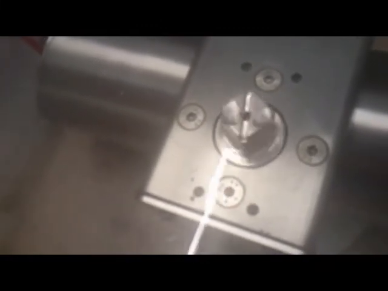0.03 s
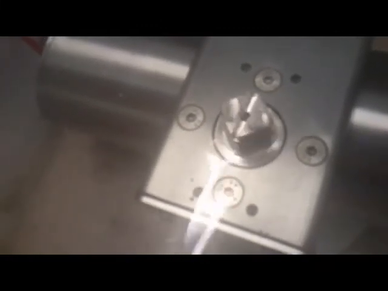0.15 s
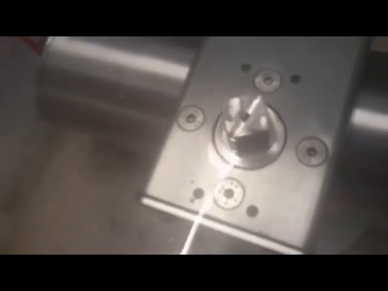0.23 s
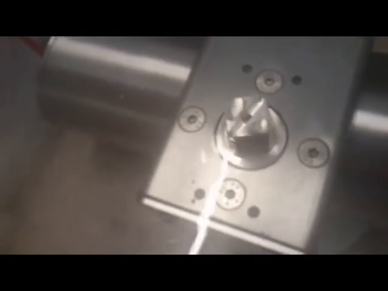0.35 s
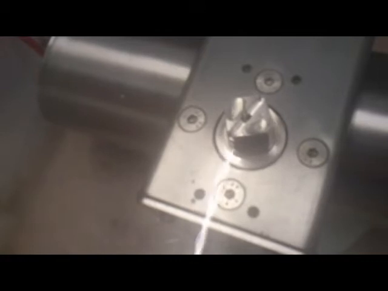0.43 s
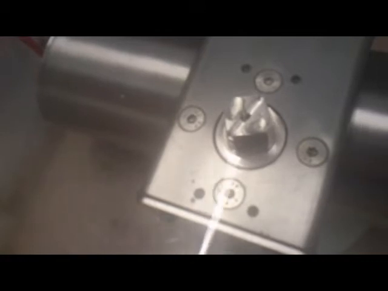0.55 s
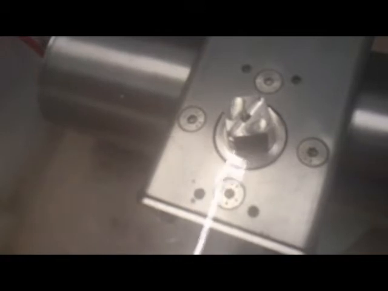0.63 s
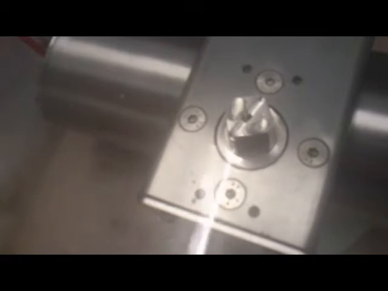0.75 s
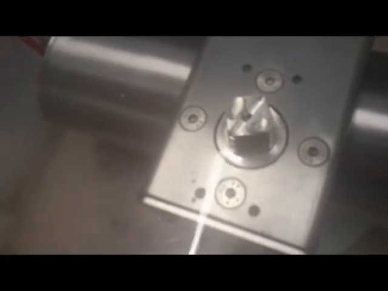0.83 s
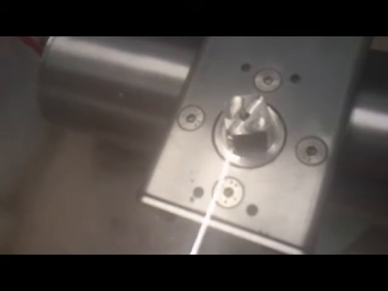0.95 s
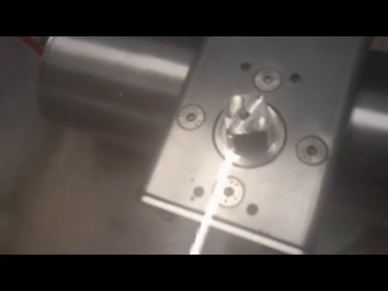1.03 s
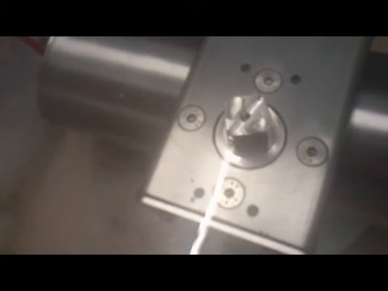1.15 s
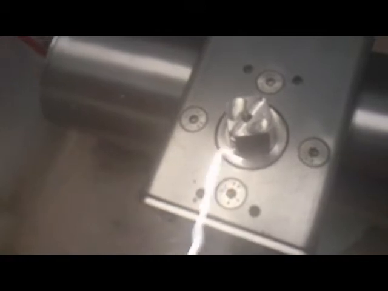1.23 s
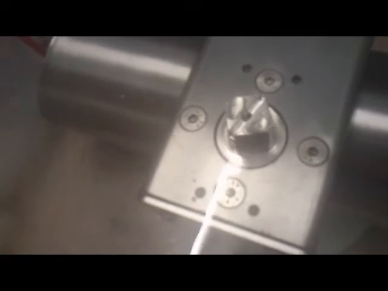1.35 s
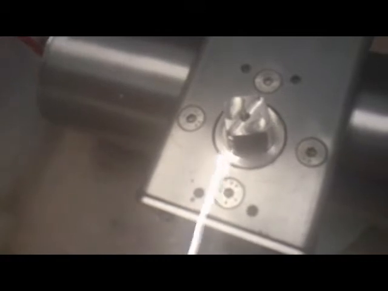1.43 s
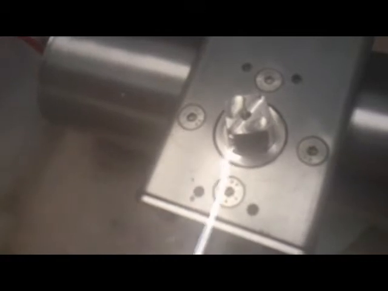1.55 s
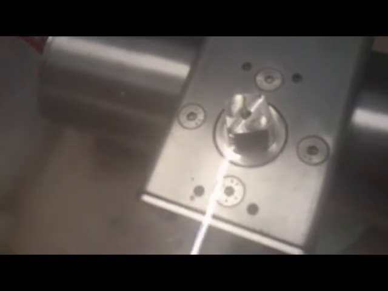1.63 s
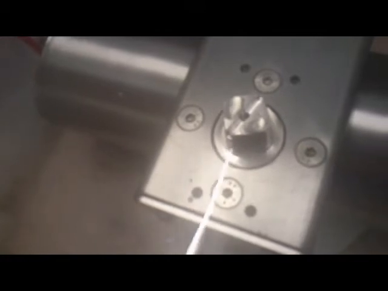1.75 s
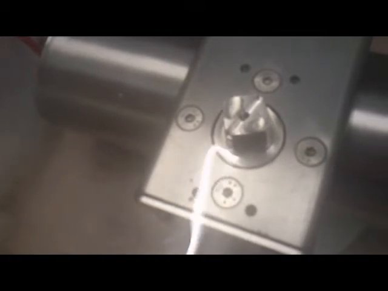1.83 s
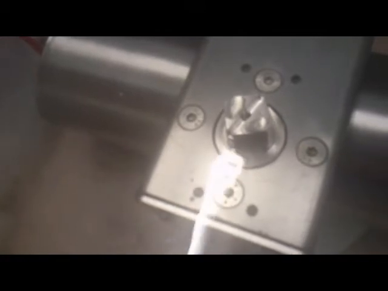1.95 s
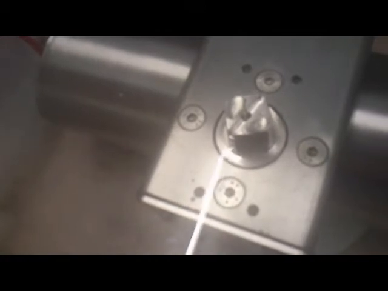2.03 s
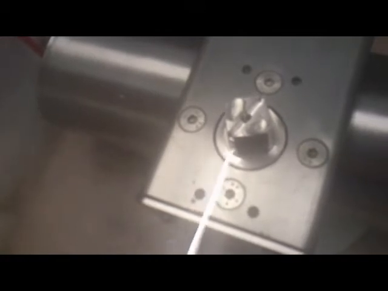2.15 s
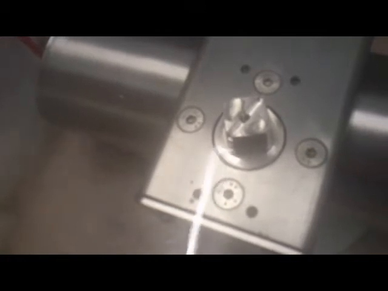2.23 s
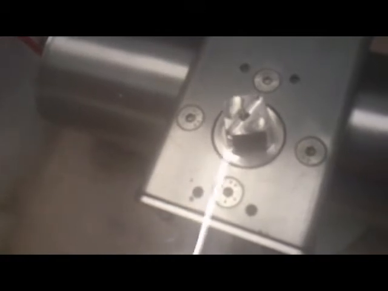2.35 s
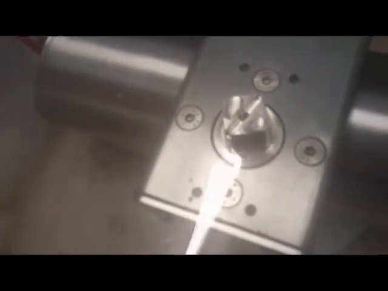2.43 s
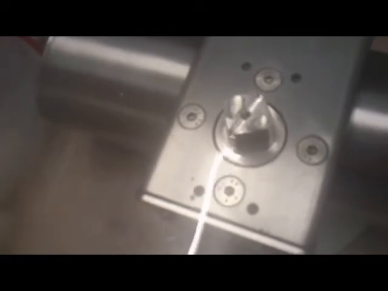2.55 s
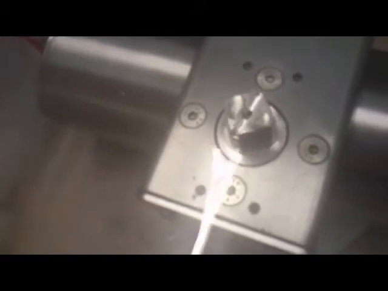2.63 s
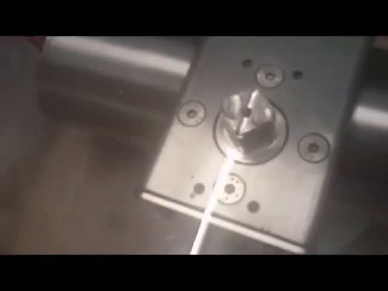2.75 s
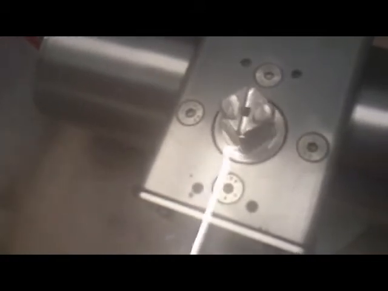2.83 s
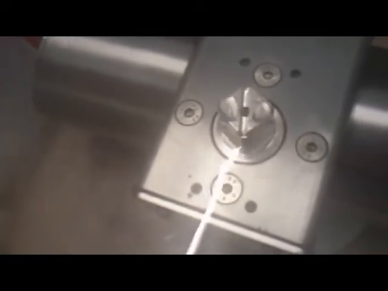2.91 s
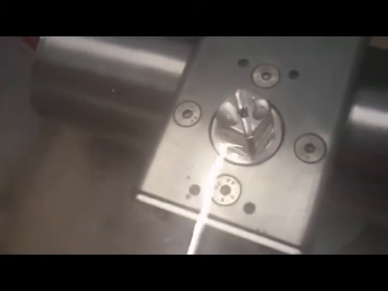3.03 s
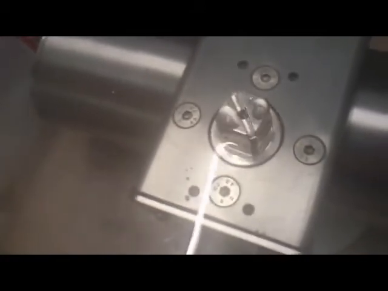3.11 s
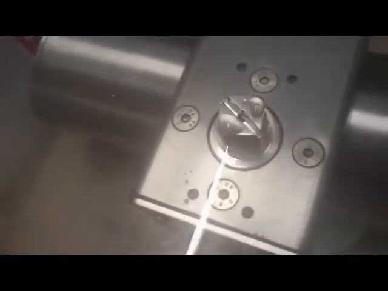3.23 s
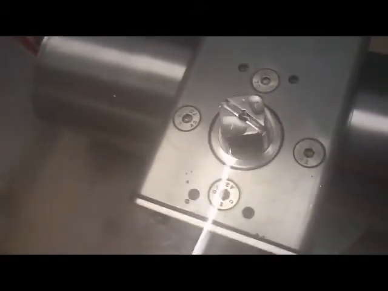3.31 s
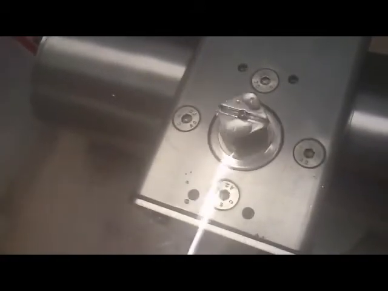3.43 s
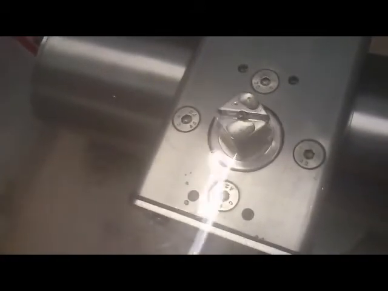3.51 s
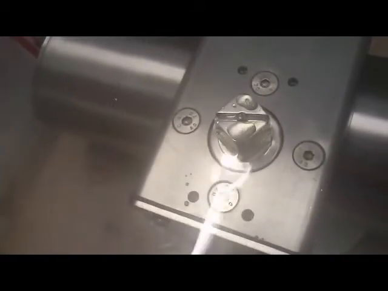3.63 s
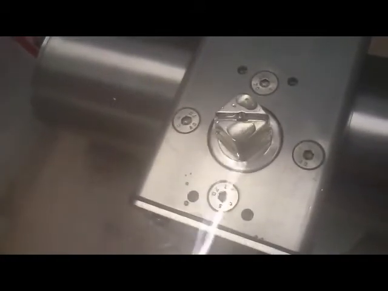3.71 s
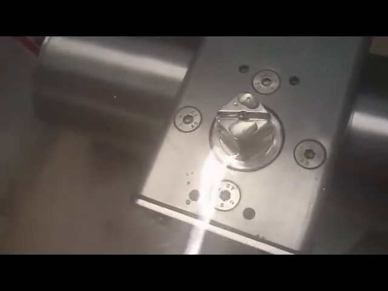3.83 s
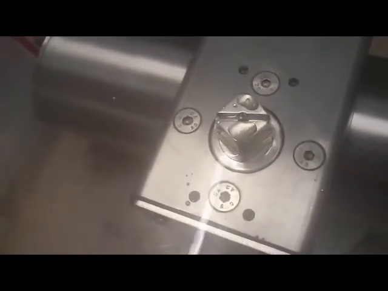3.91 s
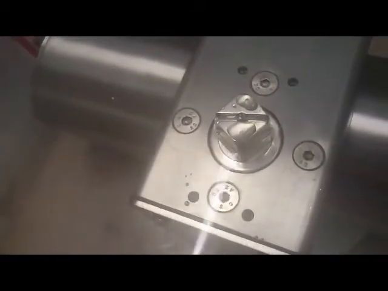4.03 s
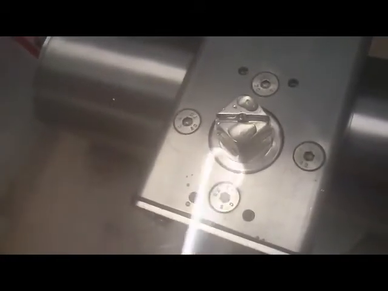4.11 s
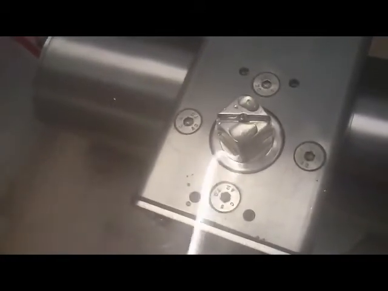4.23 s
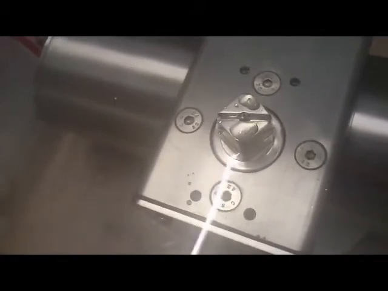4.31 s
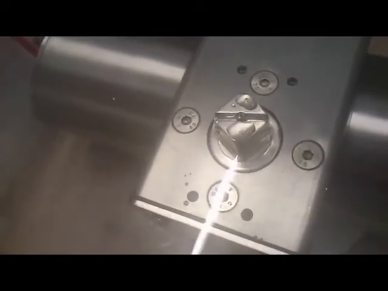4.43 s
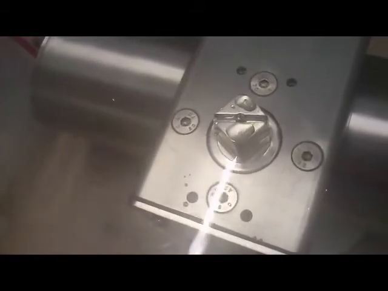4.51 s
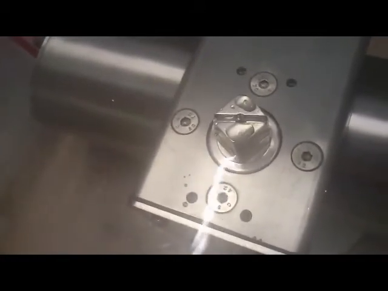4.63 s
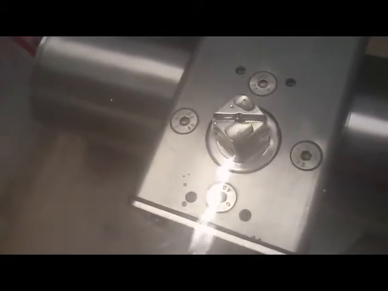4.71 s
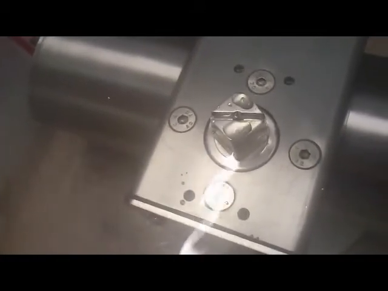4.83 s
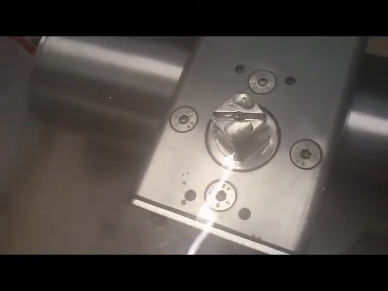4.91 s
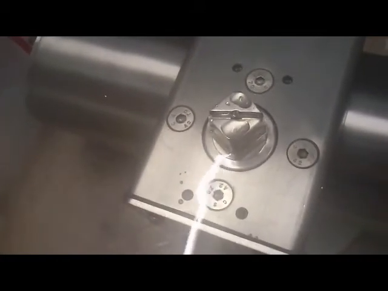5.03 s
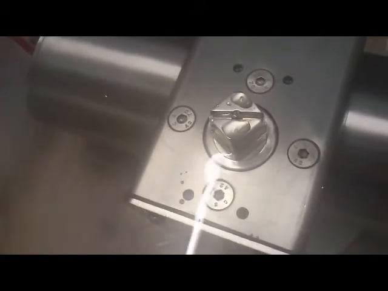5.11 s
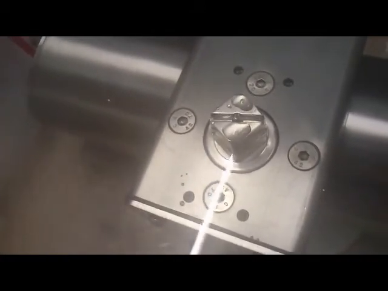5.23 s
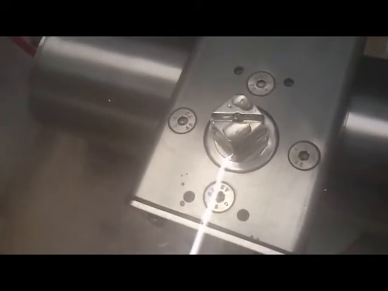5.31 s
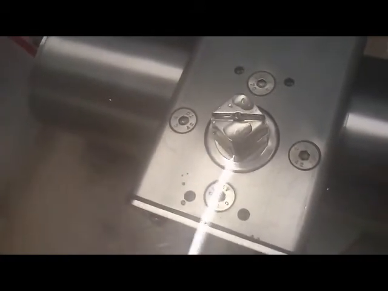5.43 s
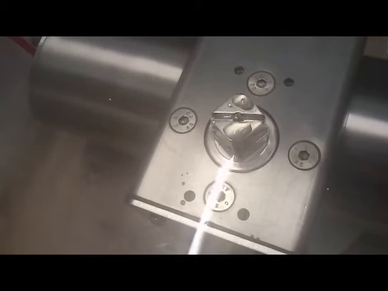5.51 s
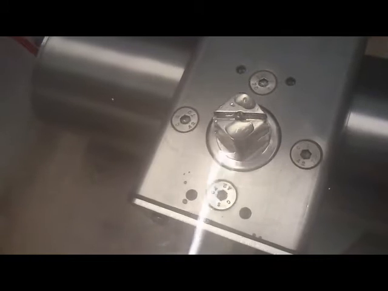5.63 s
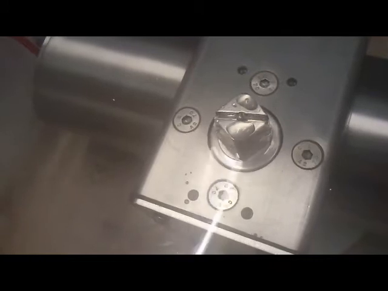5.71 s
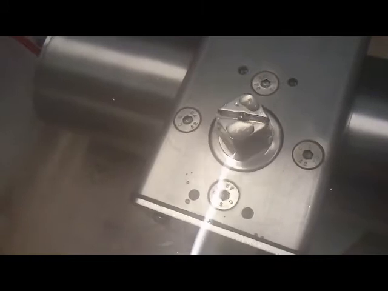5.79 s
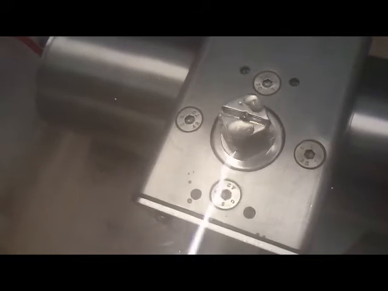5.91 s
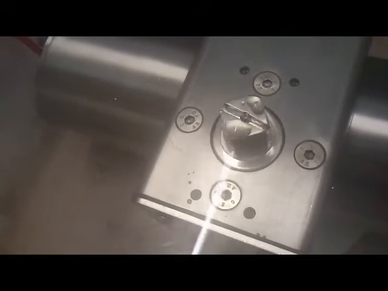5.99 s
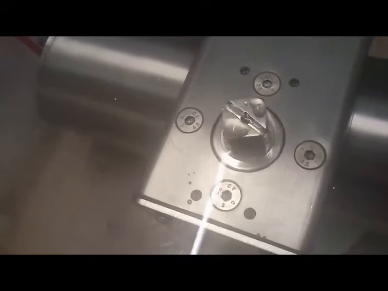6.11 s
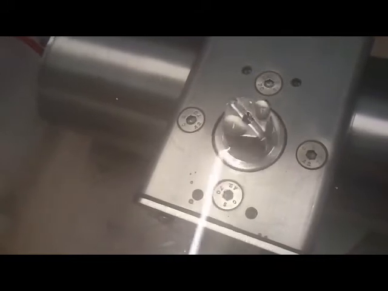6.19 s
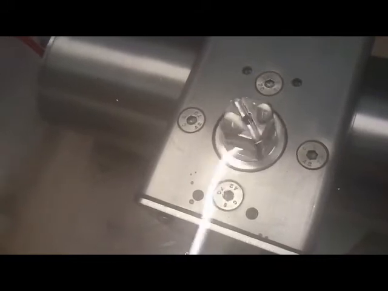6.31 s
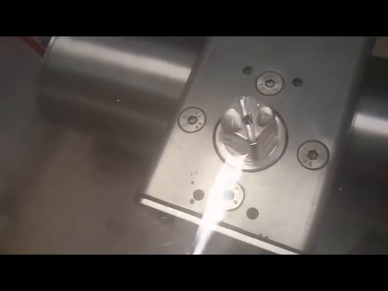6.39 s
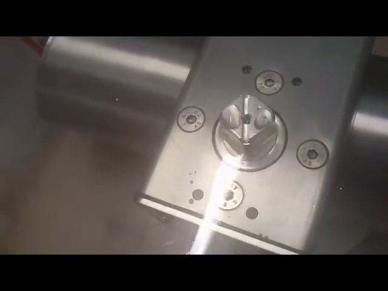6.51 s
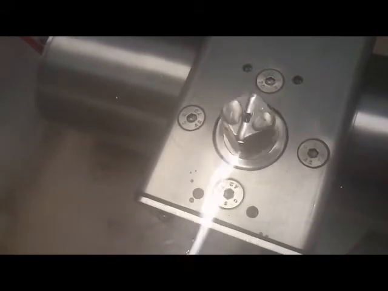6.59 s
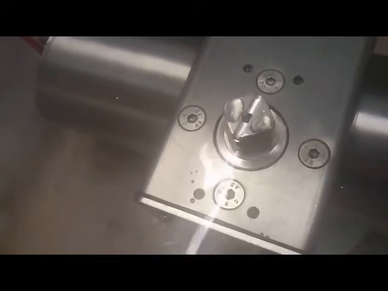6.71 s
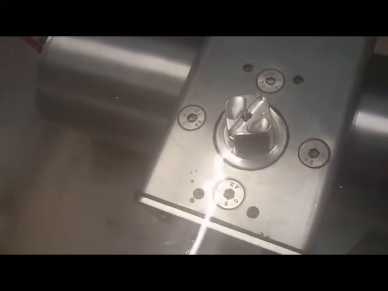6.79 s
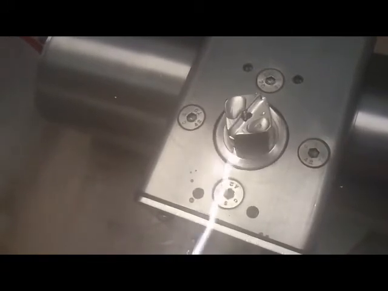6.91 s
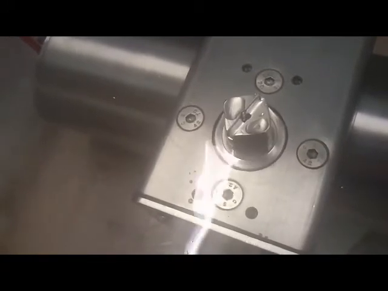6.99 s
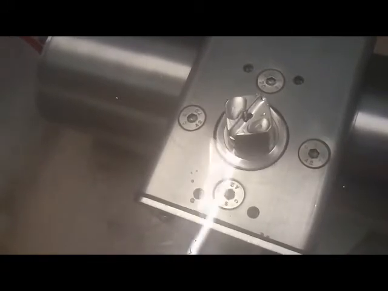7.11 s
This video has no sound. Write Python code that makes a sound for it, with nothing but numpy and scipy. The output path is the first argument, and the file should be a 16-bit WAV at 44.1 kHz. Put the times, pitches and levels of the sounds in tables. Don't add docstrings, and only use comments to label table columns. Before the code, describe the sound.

A close stereo pickup in a small, hard workshop starts amid a loud, bright roar of compressed air, stronger on the right. It shuts abruptly at about 0.5 s with a short room tail. Thin leaking hiss and a faint, wavering high whistle, slightly rising, die away by about 1.8 s, while dull bench knocks come between 0.8 and 1.3 s, the last strongest. Quiet machine hum and room noise remain. At 2.7 s a thump opens a second blast, surging briefly, then swelling and dulling until it shuts at 3.8 s with a knock. A weaker leak fades until about 5 s, with a faint dull knock near 4.4 s. At 5.9 s the hardest thump launches the third roar, which gradually thins, with small bumps and knocks around 6.7 s, sagging and closing near 7.1 s.

```python
import sys
import numpy as np
from scipy import signal
from scipy.fft import rfft, irfft, next_fast_len
from scipy.io import wavfile
from scipy.ndimage import uniform_filter1d

SR = 44100
rng = np.random.default_rng(int(sys.argv[2]) if len(sys.argv) > 2 else 0)


def digitize_waveform(pressure):
    field = np.atleast_2d(pressure).T
    bounded = np.clip(field, -1, 1)
    quanta = np.round(bounded * 32767).astype(np.int16)
    wavfile.write(sys.argv[1], SR, quanta)


def natural_amplitude(level_db):
    exponent = np.asarray(level_db, float) / 20
    return 10 ** exponent


N = 315315
TIME = np.arange(N) / SR


def rms_one(x):
    return x / np.sqrt(np.mean(x ** 2) + 1e-20)


def at_hz(points, hz):
    table_hz, value = np.array(points).T
    return np.interp(np.log(hz + 1), np.log(table_hz), value)


def drift(rate_hz):
    r = np.exp(-80 * np.pi * rate_hz / SR)
    draws = rng.standard_normal(N // 40 + 2002)
    slow = signal.lfilter([1], [1, -2 * r, r * r], draws)[2000:]
    return np.interp(np.arange(N) / 40, np.arange(len(slow)), rms_one(slow))


def resonate(x, hz, width_hz):
    r = np.exp(-np.pi * width_hz / SR)
    return signal.lfilter([1 - r, 0, r - 1], [1, -2 * r * np.cos(2 * np.pi * hz / SR), r * r], x)


def ring(clicks, hz, t60_s):
    r = natural_amplitude(-60 / (t60_s * SR))
    w = 2 * np.pi * hz / SR
    return signal.lfilter([0, np.sin(w)], [1, -2 * r * np.cos(w), r * r], clicks + 1e-18)


# band_hz, t60_s
ROOM_T60 = [(200, 0.2), (1500, .4), (5000, 0.41), (14000, 0.36)]
# left_db, right_db
DIRECT_DB = (-7, 3.5)


def room_paths(count, size):
    t = np.arange(int(.7 * SR)) / SR
    hz = np.fft.rfftfreq(size, 1 / SR)
    edges_hz, centres_hz = [0, 600, 2500, 6000, 10000, SR], [300, 1300, 4000, 8000, 13000]
    first_wall_s, max_lag_s = 0.0032, .0006
    echoes = rng.standard_normal((count, 2, len(t))) * np.clip(t / first_wall_s - 1, 0, 1)
    paths = 0
    for low, high, centre in zip(edges_hz, edges_hz[1:], centres_hz):
        dying = natural_amplitude(-60 * t / at_hz(ROOM_T60, centre))
        dying = dying / np.sqrt(np.sum(dying ** 2))
        paths = paths + rfft(echoes * dying, size) * ((hz >= low) & (hz < high))
    lags_s = rng.uniform(0, max_lag_s, (count, 2, 1))
    direct = natural_amplitude(np.array(DIRECT_DB))[:, None]
    return (paths + direct * np.exp(-2j * np.pi * hz * lags_s)) / np.sqrt(1 + direct ** 2)


# open_s, shut_s, opening_s, surge_db (before gain control settles), sag_db (before shutting)
VALVE = [
    (-.6, 0.541, .012, 6, 0.2),
    (2.704, 3.83, 0.019, 8, 2),
    (5.868, 7.144, 0.012, 11, 9),
]
# swell_db_per_s, dulling_db_per_s, body_db_per_s, rumble_db_per_s,
# left_turn_db_per_s
TRAVEL = [
    (1, -4, -0.8, -8, 3),
    (1.6, -5.5, 2, -8, -3),
    (-1.5, 0, -4.5, 2, -3),
]
MIDWAY_S = (.25, 3.25, 6.5)
# pitch_hz, density_db (per Hz)
JET_LEFT = [
    [(70, -88), (1420, -73), (1770, -74), (2080, -57.5), (2660, -71.5), (3040, -57), (3300, -61),
     (4210, -54.5), (4570, -57), (7870, -58), (9260, -72.5), (10900, -65), (13200, -60), (15500, -58.5)],
    [(70, -84.5), (1280, -74), (2080, -69.5), (2730, -72), (3130, -63.5), (3390, -65.5), (3780, -62),
     (4450, -55.5), (6000, -63), (6680, -57), (7060, -60), (9260, -69.5), (10900, -65.5), (15500, -59.5)],
    [(70, -82.5), (922, -75.5), (2200, -68), (2520, -64.5), (2960, -59.5), (3300, -68), (3480, -58.5),
     (4450, -57), (4960, -58), (6330, -56), (8530, -62.5), (10600, -61.5), (12800, -59), (15500, -62.5)],
]
# pitch_hz, density_db (per Hz)
JET_RIGHT = [
    [(70, -90), (947, -73), (1240, -61.5), (1970, -52.5), (2380, -59.5), (2590, -52), (3130, -53.5),
     (3780, -57.5), (4700, -51), (5530, -53), (7650, -54), (9510, -59), (13200, -53), (15500, -61.5)],
    [(70, -76.5), (947, -76.5), (1110, -68.5), (1180, -61), (1350, -60), (2140, -58.5), (2660, -54),
     (3300, -58), (3580, -53.5), (4100, -55.5), (4960, -50.5), (8530, -57), (12100, -53.5), (15500, -60)],
    [(70, -77.5), (1030, -72), (1240, -62), (1460, -62), (1920, -54.5), (2520, -58.5), (3210, -52),
     (3480, -57.5), (4210, -53), (5090, -55.5), (6330, -54), (8770, -57), (11800, -51.5), (15500, -60.5)],
]
# centre_hz, width_hz, level_db
PORT = [
    [(3810, 150, 1), (4770, 142, 2), (10560, 420, -1)],
    [(3350, 36, 0.5), (4060, 100, -3.5), (4590, 100, 0.5), (6510, 78, 4)],
    [(3400, 90, -1.5), (3880, 90, 2), (4120, 110, -5), (4620, 110, 2.5), (4950, 80, -4), (5750, 83, -5.5)],
]
# pitch_hz, level_db
RUMBLE_COLOUR = [(50, -1.5), (130, 0), (290, 3), (430, -1.5), (580, 2), (750, -1), (1000, 1)]
SPLIT_HZ = (1000, 3000, 7800)


def jet(stroke, travel, midway_s, left, right, port):
    opens_s, shuts_s, opening_s, surge_db, sag_db = stroke
    shutting_s, surge_s, sag_s = 0.009, 0.02, 0.05
    rush_db, rush_s = 4, .2
    wander_rad_per_s = 1.34
    first, size = round(opens_s * SR), next_fast_len(2 * SR + 20000)
    t = np.arange(size) / SR
    hz = np.fft.rfftfreq(size, 1 / SR)
    from_shut_s = t + opens_s - shuts_s

    gate = np.clip(t / opening_s, 0, 1) ** 1.7
    gate = gate * np.exp(-np.maximum(from_shut_s, 0) / shutting_s) * (t < 1.5)
    spot_phase = np.pi / 2 * np.array([[[0]], [[1]]])
    share = np.sqrt(2) * np.cos(wander_rad_per_s * t - spot_phase)
    spots = rfft(gate * share * rng.standard_normal((2, 1, size)))

    colour_db = np.array([at_hz(left, hz), at_hz(right, hz)]) + at_hz(RUMBLE_COLOUR, hz)
    for centre_hz, width_hz, level_db in port:
        colour_db = colour_db + level_db * np.exp(-((hz - centre_hz) / width_hz) ** 2)
    heard = np.sum(spots * room_paths(count=2, size=size), axis=0)
    heard = heard * natural_amplitude(colour_db) * np.sqrt(SR / 4)

    travelled_s = np.minimum(t + opens_s, shuts_s) - midway_s
    swell_db, highs_db, lows_db, rumble_db, pan_db = np.outer(travel, travelled_s)
    rumble_db = rumble_db + rush_db * np.exp(-t / rush_s) + 2.0 * np.resize(drift(6.5), size)
    bass, low, middle = [1 / (1 + (hz / edge_hz) ** 6) for edge_hz in SPLIT_HZ]
    bands = (bass, low - bass, middle - low, 1 - middle)
    shaded = 0
    for band, band_db in zip(bands, (rumble_db, lows_db, 0, highs_db)):
        shaded = shaded + irfft(heard * band, size) * natural_amplitude(band_db)

    overshoot_db = surge_db * np.exp(-np.maximum(t - opening_s, 0) / surge_s)
    droop_db = sag_db * np.exp(np.minimum(from_shut_s, 0) / sag_s)
    level_db = swell_db + overshoot_db * np.array([[1.25], [1]])
    level_db = level_db - droop_db * np.array([[.7], [1.1]]) + pan_db * np.array([[.7], [-.3]])
    out = np.zeros((2, N + 2 * size))
    out[:, size + first:2 * size + first] = shaded * natural_amplitude(level_db)
    return out[:, size:size + N]


def coloured(points, likeness, pan):
    hz = np.fft.rfftfreq(N, 1 / SR)
    mid, side = rfft(rng.standard_normal((2, N))) * natural_amplitude(at_hz(points, hz)) * (hz > 12)
    alike = np.clip(at_hz(likeness, hz), -1, 1)
    pair = np.sqrt(1 + alike) * mid + np.sqrt(1 - alike) * side * [[1], [-1]]
    pair = irfft(pair * natural_amplitude(at_hz(pan, hz) * [[.5], [-.5]]), N)
    return pair / np.std(np.mean(pair, axis=0))


# pitch_hz, density_db (per Hz)
FLOOR = [(12, -29.5), (20, 1), (48, -9.5), (137, -14), (209, -14.5), (240, -15.5), (355, -13), (496, -20.5),
         (586, -16.5), (797, -25), (1180, -20.5), (1650, -26), (5620, -33.5), (7440, -40.5), (15800, -42.5)]
# pitch_hz, left_right_likeness
LIKENESS = [(60, 1), (130, 0.32), (290, 0.94), (640, 0.38), (1410, 0.038), (3100, -0.051), (6820, -0.0),
            (15000, -0.57)]
# pitch_hz, left_minus_right_db
FLOOR_PAN = [(60, -7), (110, -6), (200, -1), (380, -4), (700, -3), (1290, -2), (2380, -4.5), (4400, 1),
             (8120, 0.5), (15000, -1.5)]
# pitch_hz, width_hz, level_db (rms)
HUM = [(284, 5.7, -75.5), (350, 12, -76.5), (554, 27, -83.5), (620, 10, -85.5)]


def workshop():
    floor_db, motor_hz, motor_db = -59.5, 600, -73
    floor = natural_amplitude(floor_db) * coloured(FLOOR, LIKENESS, FLOOR_PAN)
    white = rng.standard_normal((2, N))
    shared = white + 0.46 * white[::-1]
    for hz, width_hz, level_db in HUM:
        floor = floor + natural_amplitude(level_db) * rms_one(resonate(shared, hz, width_hz))
    motor_level = natural_amplitude(motor_db + 1.2 * drift(8))
    phase = np.cumsum(motor_hz + 0.9 * drift(11)) * 2 * np.pi / SR
    floor = floor + motor_level * np.sqrt(2) * np.sin(phase)
    return floor * natural_amplitude(1.2 * drift(2.3))


def ducking():
    depth_db, settling_s = -2, 0.49
    roaring = sum((TIME > opens_s) * (TIME < shuts_s) for opens_s, shuts_s, *rest in VALVE)
    r = np.exp(-1 / (settling_s * SR))
    return natural_amplitude(depth_db * signal.lfilter([1 - r], [1, -r], roaring, zi=[.8])[0])


# start_s, peak_db, brightness_db
KNOCKS = [(0.533, -60, -10), (.77, -48.5, -5), (.93, -56, 4), (1.094, -40, -3.5), (1.157, -50, -8),
          (1.169, -55.5, -8), (1.304, -36.5, 0.5), (2.745, -39, -2), (2.789, -40, -4.5), (3.809, -41, -6),
          (4.365, -53, -15), (5.875, -32.5, 5), (6.636, -45.5, 12), (6.732, -39, 9), (7.116, -45.5, 9)]
# pitch_hz, level_db, t60_s
BENCH_LOW = [(91, -2.5, .25), (132, -1.5, 0.13), (217, -0.5, 0.12)]
# pitch_hz, level_db, t60_s
BENCH_HIGH = [(320, -10.5, 0.14), (484, 5.5, 0.041), (544, 6, .035), (820, -9.5, .03), (1010, -6.5, 0.025),
              (1290, -9.5, 0.082), (1650, -10, .025), (2020, -7, .02)]
# start_s, peak_db, width_s, sign
THUMPS = [
    (2.706, -33.5, .003, -1),
    (2.855, -38, .004, 1),
    (5.868, -24.5, .003, -1),
    (6.66, -45, .003, 1),
    (6.776, -46, 0.0023, 1),
    (6.804, -36, 0.0014, -1),
]


def bench():
    start_s, peak_db, bright_db = np.transpose(KNOCKS)
    mode_lag_s, contact_hz, microphone_lag_s = .0004, 2600, .00015
    at = np.round(start_s * SR).astype(int)
    out = np.zeros(N)
    for modes, share_db in ((BENCH_LOW, 0 * start_s), (BENCH_HIGH, bright_db)):
        for k, (hz, level_db, t60_s) in enumerate(modes):
            sign = (-1) ** (k // 2 + 1)
            clicks = np.zeros(N)
            clicks[at + k * round(mode_lag_s * SR)] = sign * natural_amplitude(peak_db + share_db + level_db - 5)
            out += ring(clicks, hz, t60_s)
    out = signal.sosfilt(signal.butter(2, contact_hz, fs=SR, output="sos"), out)
    for thump_s, level_db, width_s, sign in THUMPS:
        age = np.maximum(TIME - thump_s, 0) / width_s
        out += np.sign(sign) * natural_amplitude(level_db) * age * (1 - .5 * age) * np.exp(1 - age) * 1.9
    late = np.roll(out, round(microphone_lag_s * SR))
    return np.array([out, late]) * natural_amplitude([[-.4], [.4]])


# start_s, until_dry_s, hiss_db, whistle_db, whistle_fading_db_per_s
LEAK = [
    (.55, 1.3, -56, -60, 14.5),
    (3.85, 1.21, -54.5, -70, 4),
]
# pitch_hz, density_db (per Hz)
LEAK_HISS = [(590, -18), (1000, -3), (1480, -36.5), (1730, -6), (1880, -4.5), (2590, -8.5), (4440, -6.5),
             (5040, -6.5), (15500, -11.5)]
# centre_hz, width_hz, level_db (over whistle)
LEAK_PEAKS = [
    [(1084, 110, -4), (3270, 110, -8.5), (4600, 90, -4.5), (11960, 640, -7)],
    [(960, 49, 2), (1330, 62, -0.5), (4375, 140, -4.5), (11500, 1200, 2.5)],
]


def leak(row, peaks):
    start_s, lasts_s, hiss_db, whistle_db, fading_db_per_s = row
    whistle_hz, rise_hz_per_s = 1852, 70
    hiss_power, whistle_power, stall_pressure = 1.61, 0.3, .27
    age_s = np.maximum(TIME - start_s, 0)
    pressure, onset = np.clip(1 - age_s / lasts_s, 0, 1), np.clip(age_s / 0.067, 0, 1)
    phase = np.cumsum(whistle_hz + rise_hz_per_s * age_s + 9 * drift(25)) * 2 * np.pi / SR
    tones = np.sqrt(2) * np.sin(phase) * natural_amplitude(3 * drift(30))
    white = rng.standard_normal(N)
    for hz, width_hz, level_db in peaks:
        peak = resonate(resonate(white, hz, width_hz), hz, width_hz)
        tones = tones + natural_amplitude(level_db) * rms_one(peak)
    drive = np.clip(pressure - stall_pressure, 0, 1) ** whistle_power
    whistle = natural_amplitude(whistle_db - fading_db_per_s * age_s) * drive * tones * natural_amplitude([[-6], [3]])
    hiss = coloured(LEAK_HISS, likeness=[(1000, 0.0926), (9000, 0.002)],
                    pan=[(1000, -1), (5000, -0.5), (12000, -1.5)])
    return onset * (natural_amplitude(hiss_db) * pressure ** hiss_power * hiss + whistle)


def scene():
    jets = sum(jet(*stroke) for stroke in zip(VALVE, TRAVEL, MIDWAY_S, JET_LEFT, JET_RIGHT, PORT))
    leaks = sum(leak(row, peaks) for row, peaks in zip(LEAK, LEAK_PEAKS))
    return jets + ducking() * workshop() + bench() + leaks


# pitch_hz, gap_db
GAP_DB = [(2300, -8), (3500, -3.3), (6000, -3.4), (9000, -3), (11000, -3.4), (12500, -3.4), (14500, -1)]


def drop_weak_bands(x):
    hz, _, cells = signal.stft(x, SR, nperseg=2048)
    hz = hz[:1024]
    power = uniform_filter1d(np.abs(cells) ** 2, size=3, axis=2)
    band = power[:, :1024].reshape(2, 128, 8, -1).mean(axis=2)
    band = np.repeat(band, 8, axis=1)
    around = uniform_filter1d(np.maximum(band[:, 96:], 1e-16), size=161, axis=1)
    around = np.concatenate([band[:, :96] + 1e-16, around], axis=1)
    margin_db = 10 * np.log10(band / around + 1e-9) - at_hz(GAP_DB, hz)[:, None]

    loudness = np.sum(np.abs(cells) ** 2, axis=1, keepdims=True)
    attack = np.roll(loudness, -1, axis=2) > 20 * np.roll(loudness, 1, axis=2)
    margin_db = margin_db + 20 * attack

    luck = uniform_filter1d(rng.standard_normal((2, 128, cells.shape[2])), size=5, axis=2)
    luck = .6 * luck + .7 * luck[0] + .3 * luck[1]
    margin_db = margin_db + 3.6 * np.repeat(luck, 8, axis=1)

    treble_db = 10 * np.log10(np.sum(power[:, 100:], axis=1, keepdims=True) + 1e-12)
    margin_db = margin_db + np.interp(treble_db, [-72, -67, -52, -40], [3, -1, -1, 0])

    soft_keep = 1 / (1 + np.exp(-np.clip(6 * margin_db, -9, 9)))
    keep = np.ones(cells.shape)
    keep[:, :1024] = np.where(hz[:, None] > 2300, soft_keep, 1)
    return signal.istft(cells * keep, SR, nperseg=2048)[1][:, :N]


def top_cut(x):
    return signal.sosfilt(signal.butter(12, 15730, fs=SR, output="sos"), x)


# pitch_hz, density_db (per Hz)
SELF_NOISE = [(5000, -17.5), (9000, -7), (12500, 2), (15700, -3)]


def record(dry):
    self_noise_db, cutoff_hz = -82.5, 15680
    hiss = coloured(SELF_NOISE, likeness=[(1000, 0.00038)], pan=[(1000, 0.0031)])
    low_pass = signal.ellip(12, .5, 80, cutoff_hz, fs=SR, output="sos")
    cut = signal.sosfilt(low_pass, dry + natural_amplitude(self_noise_db) * hiss)
    mix = np.clip(drop_weak_bands(cut), -1, 1)
    return top_cut(mix)


dry = scene()
out = record(dry)
digitize_waveform(out)
```